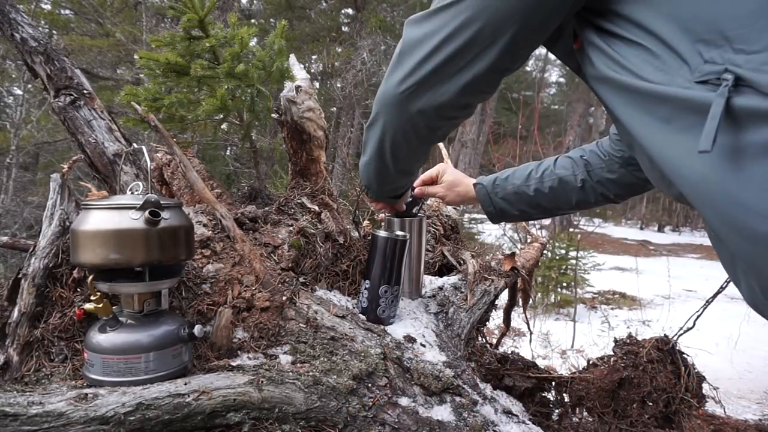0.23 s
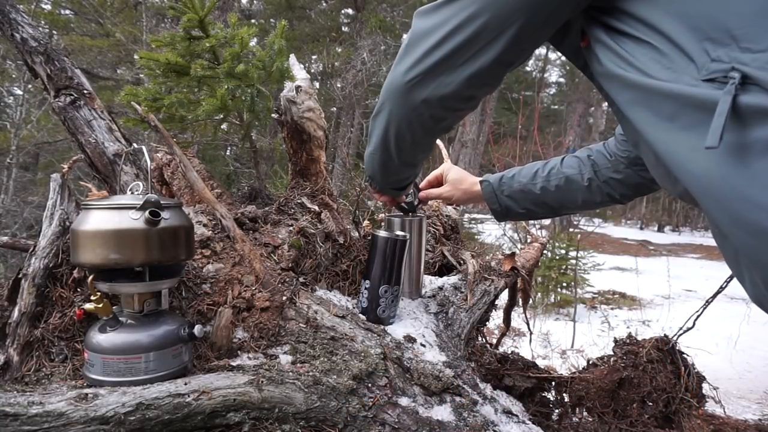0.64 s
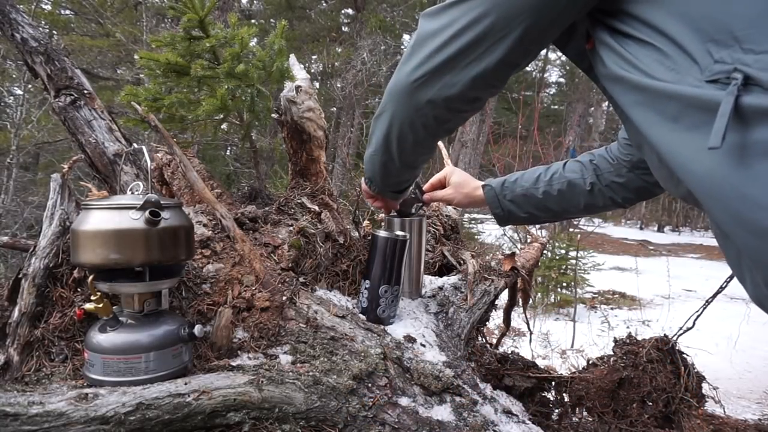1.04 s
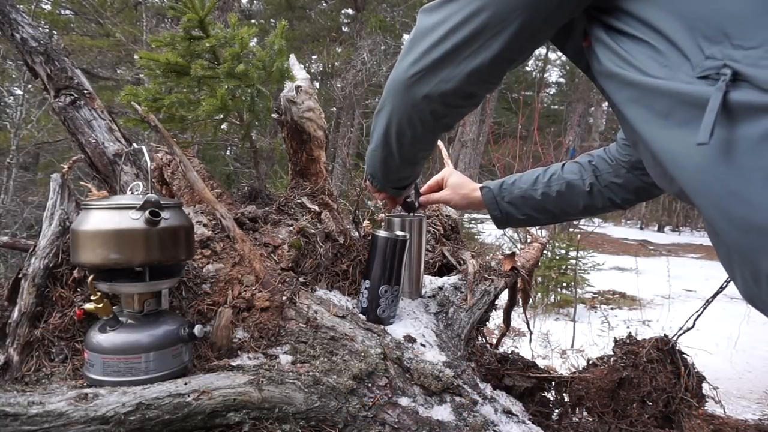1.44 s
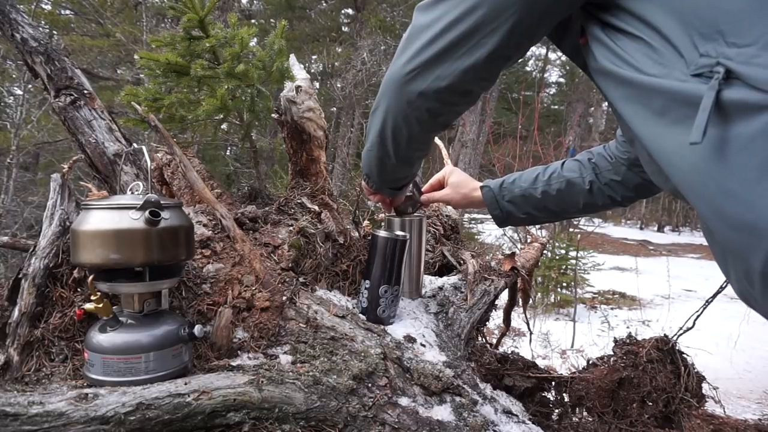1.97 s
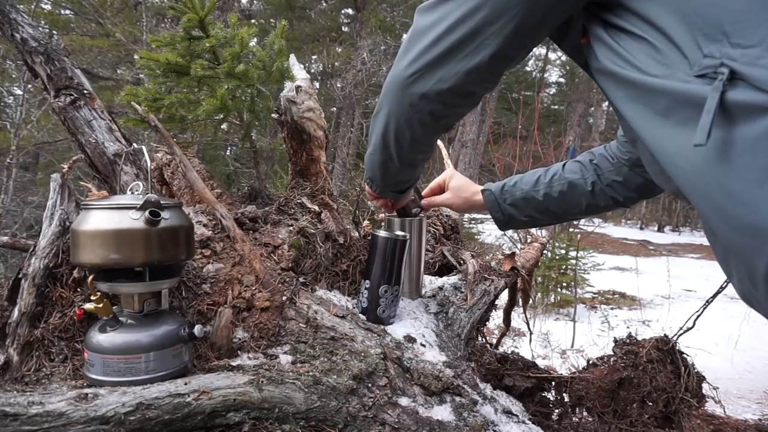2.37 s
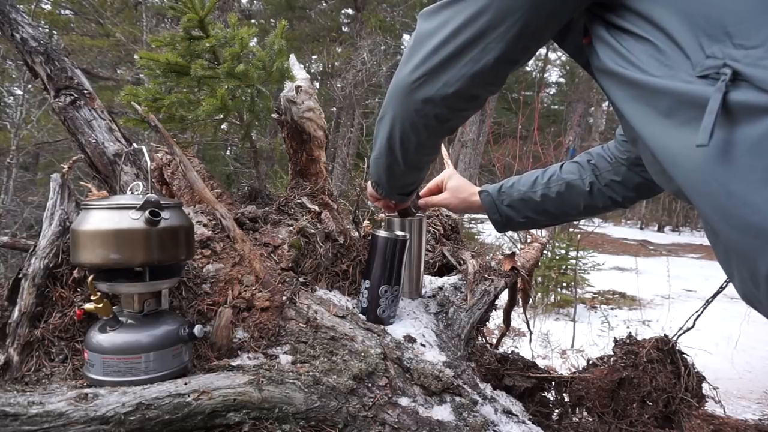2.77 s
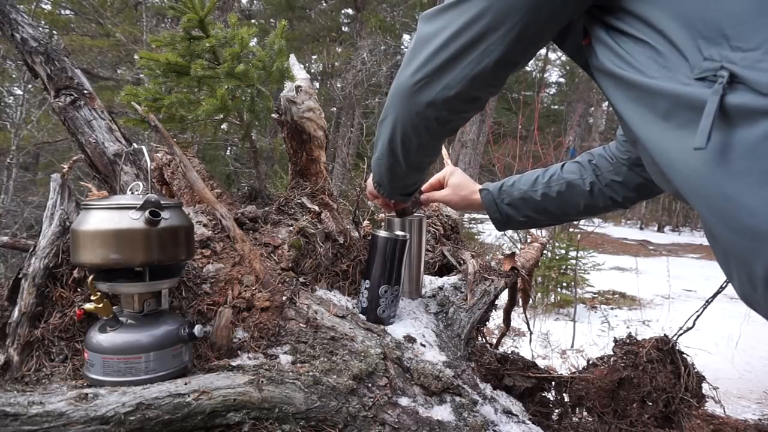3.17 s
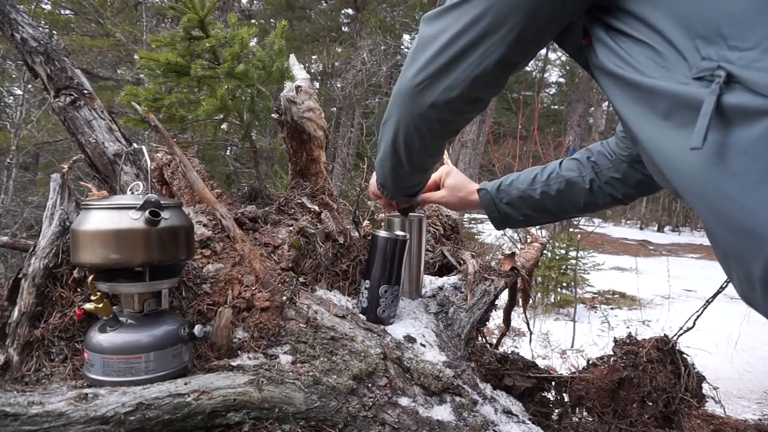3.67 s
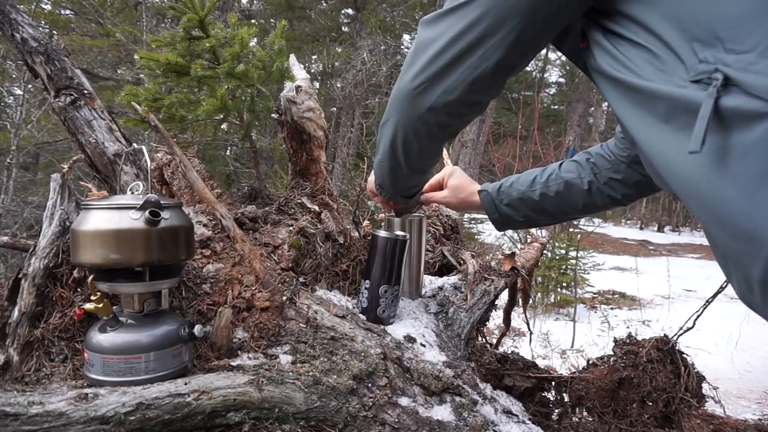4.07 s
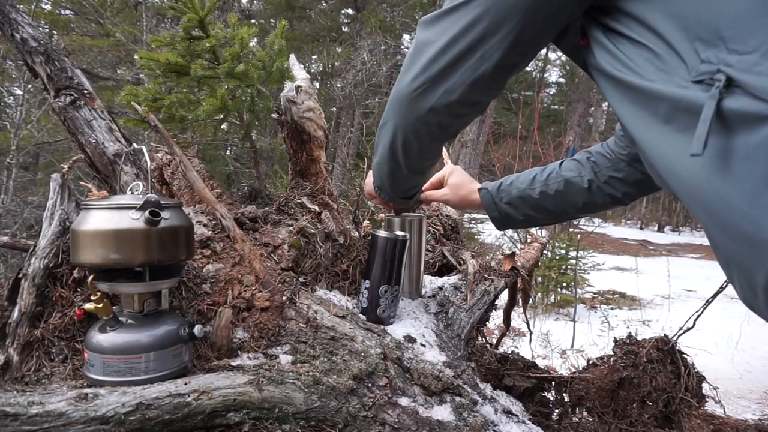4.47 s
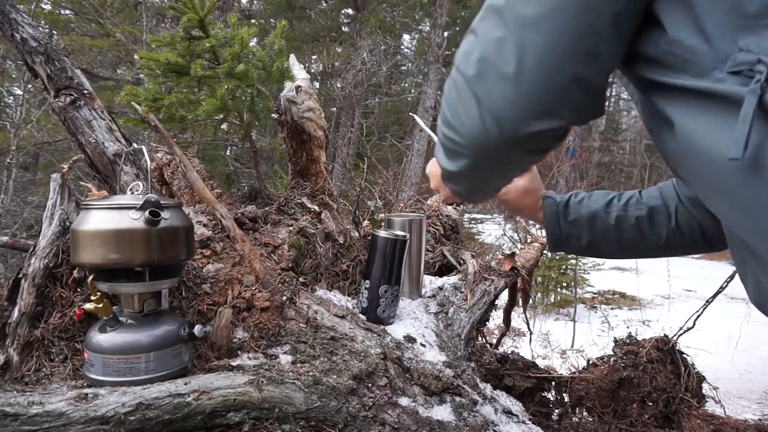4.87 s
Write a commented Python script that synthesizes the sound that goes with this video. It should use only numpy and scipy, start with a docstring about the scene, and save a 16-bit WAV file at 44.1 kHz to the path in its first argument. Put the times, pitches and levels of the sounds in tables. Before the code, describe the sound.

Close, crisp crinkling of a foil pouch with thuds and hollow metal mug taps, a stove hissing constantly behind, sleeve swishes at both ends.

```python
"""Outdoor clearing: a foil coffee packet is pinched, crinkled, then flicked empty over a steel mug.
Creases snap in tiny avalanches of buckles over a crackle of small wrinkles; fingers thud on the packet.
The air in the mug rings along as decaying modes; the packet knocks its rim.
A camp stove, shaped noise, roars and hisses steadily; a grainy sleeve swish opens and ends the scene."""
import sys
import numpy as np
from scipy import signal
from scipy.fft import rfft, irfft
from scipy.io import wavfile
from scipy.ndimage import uniform_filter1d

SR = 44100
rng = np.random.default_rng(int(sys.argv[2]) if len(sys.argv) > 2 else 0)


def master(y):
    """Save y as 16-bit WAV."""
    cut = np.clip(np.atleast_2d(y).T, -1, 1)
    pcm = np.round(cut * 32767)  # scale
    wavfile.write(sys.argv[1], SR, pcm.astype(np.int16))


N = 225306
EDGE_HZ = 15850  # upper band limit of the recorder

# stove noise density: f/Hz, relative level/dB per Hz
STOVE_SPECTRUM = [(30, -28), (100, -23), (150, -25.5), (210, -4), (300, 1), (420, -7.5), (750, -6),
                  (1200, -4), (3300, -5), (5000, -9.5), (7800, -15), (9500, -1), (13000, 0), (15800, 2.5)]
# burner and jet resonances: f/Hz, width/Hz, lift/dB
JET_RESONANCES = [(1117, 220, 6.5), (2190, 210, 1.5), (3100, 44, 7.5), (6500, 1280, 9.5),
                  (11570, 450, 10.5), (14740, 1100, 4)]
# fuel jet hiss: t/s, level/dB
HISS_LEVEL = [(0, -30.5), (.4, -32.5), (1.6, -31), (3.1, -30.5), (4.1, -30.5), (5.1, -29.5)]
# stove, likeness of left and right: f/Hz, coherence/1
STOVE_COHERENCE = [(50, .7), (130, .95), (300, .96), (700, .75), (2500, .7), (4000, .4), (5300, .7),
                   (7500, .8), (9500, .45), (11500, .7), (12500, .5), (14000, .8), (15000, .92)]
# stove, phase lead of the left port: f/Hz, lead/rad
STOVE_LEAD = [(100, 0), (400, .05), (1300, .5), (3200, .2), (4000, 2.4), (5300, 3), (6000, .1), (8500, 0),
              (9900, -1.2), (11500, -1.3), (12800, -.2), (16000, 0)]
# stove, left minus right: f/Hz, level/dB
STOVE_PAN = [(100, -2), (380, 1.5), (700, 1), (1300, 3.5), (2400, 2.5), (4400, 0), (7500, -0.5), (9500, 3),
             (11500, 3.5), (15000, 0)]
# arm sweeps rubbing the sleeve: start/s, length/s, level/dB, treble tilt at full speed/dB
SWISHES = [(-.15, 0.44, -23.5, -0.5), (4.61, .8, -28.5, 1)]
# nylon noise density: f/Hz, relative level/dB per Hz
NYLON_SPECTRUM = [(120, -45), (220, -53), (380, -8), (650, 0), (1200, 2), (2250, 5), (3800, 0), (6000, -9),
                  (11000, -6.5), (15500, -19)]
# packet, phase lead of the left port: f/Hz, lead/rad
PACKET_LEAD = [(100, 0), (900, 0), (1500, .3), (3500, -.1), (4600, .8), (5200, -.3), (5800, -3.1),
               (6400, -6.1), (10000, -6.4), (16000, -6.4)]
# packet, left minus right: f/Hz, level/dB
PACKET_PAN = [(200, 3.5), (500, 0.5), (1200, -3.5), (3000, -2), (4500, -5), (7000, -2), (10000, -0.5),
              (15000, 1)]
# air modes of the mug: f/Hz, width/Hz, level/dB
MUG_MODES = [(510, 24, -4.5), (1530, 21, -19), (2250, 15, -23), (3300, 49, -5)]
# packet against mug rim: t/s, level/dB
KNOCKS = [(3.643, -8.5), (3.879, -2.5), (4.103, -6)]
# finger blows on the packet: t/s, thud level/dB, f/Hz, air puff level before the common lift/dB
TAPS = [(0.3523, -27.5, 266, -72), (0.6023, -28, 240, -79.5), (2.722, -24, 430, -69),
        (2.7299, -28, 405, -68), (3.172, -23, 510, -52), (3.2655, -31, 504, -36), (3.296, -25, 506, -72),
        (3.397, -30.5, 426, -62), (3.6406, -17, 426, -68), (3.735, -27, 456, -44), (3.7735, -26, 460, -59),
        (3.878, -14, 397, -53), (4.1038, -33, 310, -60), (4.114, -21.5, 510, -72), (4.259, -45, 473, -44),
        (4.328, -13.5, 373, -90), (4.57, -19, 314, -75), (4.572, -24, 540, -87)]
# foil radiation density: f/Hz, relative level/dB per Hz
FOIL_SPECTRUM = [(120, -73.5), (200, -26), (393, -19.5), (517, -11.5), (706, -24.5), (863, -15),
                 (1440, -5.5), (1670, -10), (2150, 0.5), (2890, -1), (3460, 0), (5780, -12.5), (8800, -3),
                 (12500, 0), (15800, -9.5)]
# finger squeezes: start/s, length/s, treble level/dB, body level/dB
SQUEEZES = [(0, .07, -37, -36), (0.523, 0.046, -44, -36), (0.668, .06, -32, -30.5), (0.74, 0.074, -28, -45),
            (1.39, 0.13, -33, -38), (1.603, 0.086, -37, -32), (1.824, 0.11, -28, -28.5),
            (2.05, .08, -45, -36.5), (2.355, .03, -38, -31), (2.437, 0.085, -30.5, -31.5),
            (2.6, 0.11, -30, -33), (2.777, 0.079, -29, -31), (2.99, 0.19, -25.5, -32.5),
            (3.232, 0.075, -23, -27.5), (3.438, 0.11, -26.5, -24), (3.665, 0.24, -50, -29.5),
            (3.925, 0.15, -31, -33), (4.163, 0.051, -27.5, -26), (4.407, 0.13, -30.5, -34.5),
            (4.615, 0.046, -20, -20.5), (4.72, 0.037, -27.5, -26.5), (5.021, 0.088, -31, -31)]
# big creases giving way: t/s, length/s, treble energy/dB, body energy/dB (energy as rms over 1 ms)
SNAPS = [(0.043, .002, -41, -21), (0.0715, .0011, -43, -21.5), (0.1436, 0.0013, -24, -17.5),
         (0.326, 0.00092, -11, -20.5), (0.382, 0.0012, -40, -26), (0.695, 0.0028, -17, -19),
         (0.7174, .0015, -10.5, -9.5), (0.7756, 0.0018, -18, -20.5), (0.9905, 0.0024, -25, -19),
         (0.9986, 0.0009, -18.5, -33), (1.108, 0.0015, -21.5, -25.5), (1.393, 0.00021, -16, -17),
         (1.406, 0.0028, -23, -16.5), (1.422, 0.0024, -30, -22), (1.4714, 0.00088, -25, -20.5),
         (1.6455, 0.0034, -43, -19.5), (1.819, 0.0016, -23, -20.5), (1.8804, 0.00084, -27, -15),
         (1.906, 0.002, -25, -25), (2.014, 0.0024, -26, -16.5), (2.3725, .0019, -33, -17),
         (2.3853, 0.0045, -13, -14.5), (2.4437, 0.0034, -16, -16), (2.4808, 0.0074, -12.5, -13.5),
         (2.582, 0.00094, -8.5, -10), (2.6455, 0.0029, -15, -13.5), (2.7107, 0.004, -16, -11.5),
         (2.7221, 0.0027, -4.5, -12), (2.73, 0.00028, -13, -19), (2.786, 0.0017, -4, -9),
         (2.8155, 0.0057, -14, -17.5), (2.8346, 0.001, -24, -19.5), (2.932, 0.0046, -9, -10),
         (2.951, 0.0025, -7.5, -19), (3.004, 0.002, -9, -11.5), (3.011, 0.0014, -14, -14),
         (3.0437, 0.00031, -10, -12), (3.054, 0.0021, -14, -19.5), (3.102, 0.0046, -19, -23),
         (3.1672, 0.0046, -15, -9), (3.1711, 0.0073, -3.5, -8), (3.2444, 0.00038, -12, -16.5),
         (3.252, 0.0081, -13.5, -8), (3.267, 0.0022, -5.5, -10), (3.293, 0.0048, -11.5, -11),
         (3.3032, .0024, -9, -12.5), (3.388, 0.0081, -10, -9.5), (3.3982, 0.0011, -5, -6.5),
         (3.4586, 0.021, -10, -14), (3.479, .0015, -3.5, -9.5), (3.4954, 0.0045, -11.5, -18),
         (3.5495, 0.00099, -19, -15), (3.6103, 0.0013, -11, -15), (3.6403, 0.0057, -1, -3),
         (3.704, 0.0078, -5.5, -8), (3.729, 0.0013, -20, -9), (3.735, 0.0019, 1.5, -0.5),
         (3.7724, 0.0015, -4, -6.5), (3.789, .0008, -20, -25), (3.8778, 0.0055, 1, -3.5),
         (3.944, 0.0094, -3.5, -8), (4.0113, 0.00071, -36, -16), (4.1032, 0.0048, -3, -1.5),
         (4.1733, 0.0069, -5, -12), (4.259, .0021, -1, -7), (4.3293, 0.0051, -0.5, -2.5),
         (4.399, 0.0074, -1.5, -6.5), (4.413, 0.0011, -15, -15.5), (4.47, 0.0014, -41, -17.5),
         (4.5685, 0.0053, .5, -1), (4.637, 0.026, -12, -14), (5.019, 0.0013, -10, -5),
         (5.041, .0005, -14, -7.5), (5.044, .0045, -7.5, -8.5)]


def gain_of(db):
    """Decibels to amplitude factor."""
    return 10 ** (np.asarray(db) / 20)


def evened(x):
    """Scales to rms 1."""
    return x / np.sqrt(np.mean(x ** 2) + 1e-20)


def read(points, hz):
    """Interpolates a spectrum table on a log-frequency axis."""
    f, value = np.transpose(points)
    return np.interp(np.log(hz + 1), np.log(f + 1), value)


def add(mix, start_s, sound):
    """Mixes a sound in place at start_s, or at 0 if that is negative."""
    part = mix[..., max(round(start_s * SR), 0):][..., :sound.shape[-1]]
    part += sound[..., :part.shape[-1]]


def causal(db):
    """Minimum-phase spectrum: the quickest-dying response with this gain."""
    log_gain = np.log(gain_of(np.maximum(db, -100)))
    circle = np.concatenate([log_gain, log_gain[..., -2:0:-1]], -1)
    return np.exp(np.conj(signal.hilbert(circle)))[..., :log_gain.shape[-1]]


def ripple(shape, size):
    """Smooth random hills and dips of rms 1 along the last axis; size in points."""
    noise = rng.standard_normal(shape)
    return evened(uniform_filter1d(uniform_filter1d(noise, size), size))


def stove(roar_db=-37.0, flutter_db=1.0, patch_db=1.5):
    """The flame roars and flutters low down; the fuel jet hisses through its resonances."""
    frames, hz = N // 256 + 5, np.fft.rfftfreq(1024, 1 / SR)
    a, b, c, d = rng.standard_normal((4, frames, len(hz)))
    coherence = np.clip(read(STOVE_COHERENCE, hz), -1, 1)
    left = a + 1j * b
    right = coherence * left + np.sqrt(1 - coherence ** 2) * (c + 1j * d)
    lifts_db = sum(db / (1 + (2 * (hz - f) / width) ** 4) for f, width, db in JET_RESONANCES)
    eddies = evened(uniform_filter1d(ripple((frames, len(hz)), size=10), size=10, axis=0))
    spectra = np.array([left, right])
    spectra *= gain_of(read(STOVE_SPECTRUM, hz) + lifts_db + patch_db * eddies)

    def noise(band):
        """Stove noise of one band, at rms 1."""
        bins = (spectra * band).swapaxes(1, 2)
        return evened(signal.istft(bins, nperseg=1024, noverlap=768)[1][:, :N])

    high = np.clip((hz - 4500) / 1500, 0, 1)  # crossover, flame to jet
    flame = noise(1 - high) * gain_of(roar_db + flutter_db * ripple(N, size=700))
    hiss_db = np.interp(np.arange(N) / SR, *np.transpose(HISS_LEVEL))
    return flame + noise(high) * gain_of(hiss_db)


def sleeve(attack_s=.15, release_s=.33, slow_tilt_db=-5.5, grain_db=2.0, apart=.61, side_db=3.0):
    """Nylon threads catch and slip: a grainy swish, louder and brighter with arm speed."""
    t, hz = np.arange(N) / SR, np.fft.rfftfreq(N, 1 / SR)
    slips = rfft(rng.standard_normal((3, N)) * gain_of(grain_db * ripple(N, size=50)))
    diffuse = apart * (.5 + hz / 4000)  # sides differ more in the treble
    spectrum = (slips[0] + diffuse * slips[1:]) / np.sqrt(1 + diffuse ** 2 / 2)
    spectrum = spectrum * gain_of(read(NYLON_SPECTRUM, hz))
    dull = 1 / (1 + (hz / 1200) ** 4)
    low, high = irfft(spectrum * dull, N), irfft(spectrum * (1 - dull), N)
    out = np.zeros((2, N))
    for start_s, length_s, db, full_tilt_db in SWISHES:
        rise, fall = (t - start_s) / attack_s, (start_s + length_s - t) / release_s
        speed = np.sin(np.pi / 2 * np.clip(np.minimum(rise, fall), 0, 1)) ** 2
        tilt_db = full_tilt_db + slow_tilt_db * (1 - speed)
        out += gain_of(db) * speed * (low * gain_of(-2 * tilt_db) + high * gain_of(tilt_db / 2))
    return out / np.std(low + high) * gain_of([[-side_db], [side_db]])  # right is the louder


def clearing(x, near_db=-14, near_s=.005, far_db=-29, far_s=.048, dull_hz=4000):
    """Stump, arms and ground scatter the sound early; the trees return a faint dull tail."""
    t = np.arange(SR // 3) / SR
    near, far = rng.standard_normal((2, 2, len(t))) * (t > .001)
    echo = gain_of(near_db) * evened(near * np.exp(-t / near_s))
    echo += gain_of(far_db) * evened(far * np.exp(-t / far_s))
    echo = signal.lfilter(*signal.butter(1, dull_hz, fs=SR), echo) / np.sqrt(len(t))
    return signal.oaconvolve(x, echo, axes=1)[:, :N]


def ports(x, lead, pan):
    """Two microphone ports hear a source with different phase and level."""
    hz = np.fft.rfftfreq(N, 1 / SR)
    side = gain_of(read(pan, hz) / 2)
    left = side * np.exp(1j * read(lead, hz))
    return irfft(rfft(x) * np.array([left, 1 / side]), N)


def mug(x):
    """The air in the mug rings with whatever sounds at its mouth."""
    t = np.arange(SR // 10) / SR
    ring = np.zeros(len(t))
    for hz, width_hz, db in MUG_MODES:
        decay = np.exp(-np.pi * width_hz * t)
        ring += gain_of(db) * 2 * np.pi * width_hz / SR * decay * np.cos(2 * np.pi * hz * t)
    return signal.oaconvolve(x, ring[None], axes=1)[:, :N]


def rim(hz=3511, ring_s=.0043):
    """The rim pings briefly, damped by the packet that lies on it."""
    t, out = np.arange(SR // 10) / SR, np.zeros(N)
    ping = np.exp(-t / ring_s) * np.sin(2 * np.pi * hz * t)
    for start_s, db in KNOCKS:
        add(out, start_s, gain_of(db) * ping)
    return out


def taps(puff_lift_db=7, puff_s=.0037, puff_hz=72):
    """A finger blow makes the limp packet thud for a few cycles and pushes a puff of air."""
    t, out = np.arange(SR // 10) / SR, np.zeros(N)
    puff = np.exp(-t / puff_s) * np.sin(2 * np.pi * puff_hz * t)
    for start_s, db, hz, puff_db in TAPS:
        age = t * hz / .7
        flex = age * np.exp(1 - age) * np.sin(2 * np.pi * hz * t)
        thud = np.gradient(flex) * SR / (2 * np.pi * hz)  # a small panel radiates its speed
        add(out, start_s, gain_of(db) * thud)
        add(out, start_s, gain_of(puff_db + puff_lift_db) * puff)
    return out


def facet(hz, own_db=3, ring_db=6.0, ears_db=2.0, spread=1):
    """Colour in dB of one foil facet: broad hills, narrow low resonances, a little side difference."""
    narrow = ring_db * ripple(len(hz), size=10) / (1 + (hz / 6000) ** 2)
    shared = read(FOIL_SPECTRUM, hz) + spread * (own_db * ripple(len(hz), size=34) + narrow)
    return shared + ears_db * ripple((2, len(hz)), size=36)


def crackle(idle_treble_db=-50, idle_body_db=-45, halo_treble_db=-25, halo_body_db=-21, halo_s=.04,
            relax_treble_db=-39, relax_body_db=-31, relax_s=.11, per_s=200, idle_per_s=20,
            spread_db=3.0, tilt_db=2.5, body_hz=4300, treble_hz=6200, count=24):
    """Small wrinkles tick: sparse at rest, dense in squeezes, around snaps and as the foil relaxes."""
    swells = list(SQUEEZES)
    for s, length_s, treble_db, body_db in SNAPS:
        halo_start_s = s + (length_s - halo_s) / 2
        swells.append((halo_start_s, halo_s, treble_db + halo_treble_db, body_db + halo_body_db))
        swells.append((s, relax_s, treble_db + relax_treble_db, body_db + relax_body_db))
    stress = np.zeros(N)
    power = np.ones((2, N)) * gain_of([[idle_treble_db], [idle_body_db]]) ** 2
    for start_s, length_s, treble_db, body_db in swells:
        arch = np.sin(np.pi * np.arange(0, length_s, 1 / SR) / length_s) ** 2
        add(stress, start_s, arch)
        add(power, start_s, arch * gain_of([[treble_db], [body_db]]) ** 2)

    chance = (idle_per_s + per_s * np.minimum(stress, 2)) / SR  # per sample
    sizes = evened(gain_of(spread_db * np.minimum(rng.exponential(1, N), 3.5)))
    sizes = sizes * rng.choice([-1, 1], N)
    ticks = sizes * (rng.random(N) < chance) / np.sqrt(chance)  # power independent of density
    which = rng.integers(0, count, N)  # facet of each tick
    treble_gain, body_gain = np.sqrt(power)

    hz, out = np.fft.rfftfreq(2048, 1 / SR), np.zeros((2, N))
    bands_db = [-10 * np.log10(1 + edge ** 10) for edge in (treble_hz / (hz + 1), hz / body_hz)]
    for k in range(count):
        slope_db = tilt_db * rng.standard_normal() - .5  # per octave above 2 kHz
        colour = facet(hz, own_db=2.5) + slope_db * np.log2(np.maximum(hz, 2000) / 2000)
        treble, body = (evened(irfft(causal(colour + band))) / np.sqrt(2048) for band in bands_db)
        for i in np.flatnonzero(ticks * (which == k)):
            add(out, i / SR, ticks[i] * (treble_gain[i] * treble + body_gain[i] * body))
    return out


def snaps(after_db=-19, creep_db=-26, spiky_db=7.0):
    """A crease creeps, lets go as an avalanche of buckles, settles; long avalanches settle longer."""
    size, early_s = 2048, .008
    t, hz, out = np.arange(size) / SR - early_s, np.fft.rfftfreq(size, 1 / SR), np.zeros((2, N))
    bands = [(hz > 6000) & (hz < 16000), (hz > 1000) & (hz < 4800)]  # treble, body
    upper = np.clip((hz - 4800) / 1200, 0, 1)
    for s, length_s, treble_db, body_db in SNAPS:
        age = t / max(length_s, .0003)
        creep = gain_of(creep_db) * np.exp(-abs(age))
        burst = np.exp(-np.maximum(2 * age - 1.2, 0))
        settling = gain_of(after_db) * np.exp(-abs(age) / 2)
        shape = np.where(t < 0, creep, burst + settling)
        signs = rng.choice([-1, 1], size)
        spikes = gain_of(spiky_db * np.clip(rng.standard_normal(size), -2, 2))
        buckles = rfft(shape * signs * spikes)
        # big snaps move many facets, whose colours even out
        colour = facet(hz, spread=np.clip(-body_db / 20, .3, 1.1))
        # the stiff crease radiates the treble, the slack panel around it the body
        power = abs(buckles * gain_of(colour).mean(0)) ** 2 * 2 / size / (SR / 1000)
        treble_now_db, body_now_db = (10 * np.log10(power[band].sum()) for band in bands)
        colour = colour + upper * (treble_db - treble_now_db) + (1 - upper) * (body_db - body_now_db)
        add(out, s - early_s, irfft(buckles * causal(colour)))
    return out


def scene():
    """Stove, sleeve, and the packet with the mug, each with its own stereo placing."""
    packet = snaps() + crackle() + taps()
    packet = packet + mug(packet) + rim()
    packet = ports(packet + clearing(packet), PACKET_LEAD, PACKET_PAN)
    return packet + ports(stove(), STOVE_LEAD, STOVE_PAN) + sleeve()


def record(dry, threshold_db=-24, squeeze=.56, memory_s=.68):
    """Slow gain control turns loud stretches down; peaks beyond full scale clip; then the band limit."""
    keep = np.exp(-1 / (memory_s * SR))
    power = signal.lfilter([1 - keep], [1, -keep], (dry ** 2).mean(0))
    over_db = np.maximum(10 * np.log10(power + 1e-12) - threshold_db, 0)
    clipped = np.clip(dry * gain_of(-squeeze * over_db), -1, 1)
    lowpass = signal.firwin(511, EDGE_HZ, window=("kaiser", 9), fs=SR)
    return signal.oaconvolve(clipped, lowpass[None], "same")


dry = scene()
out = record(dry)
master(out)
```